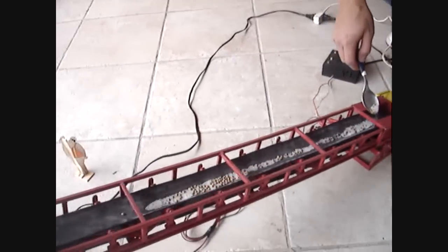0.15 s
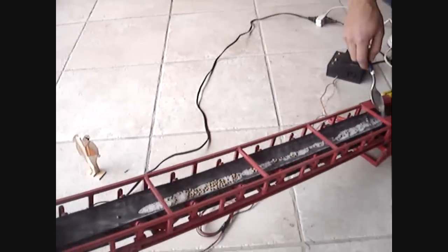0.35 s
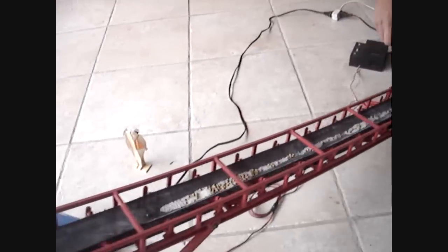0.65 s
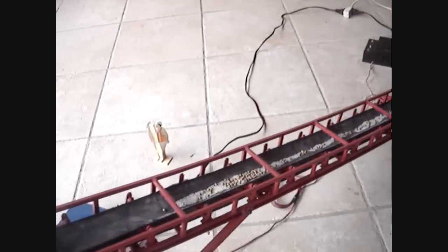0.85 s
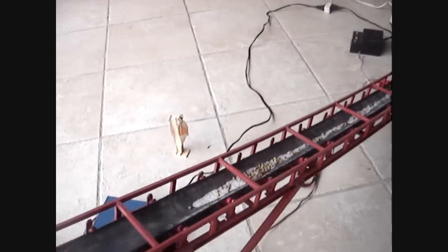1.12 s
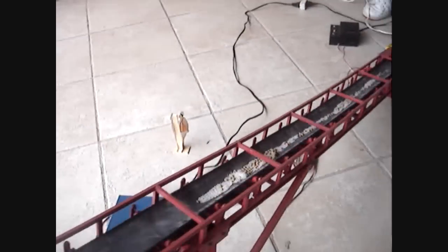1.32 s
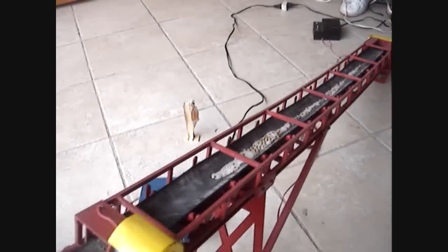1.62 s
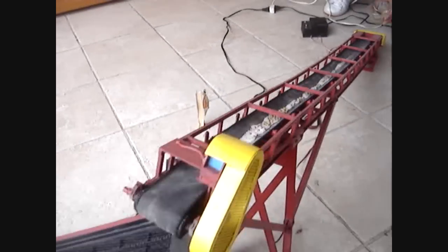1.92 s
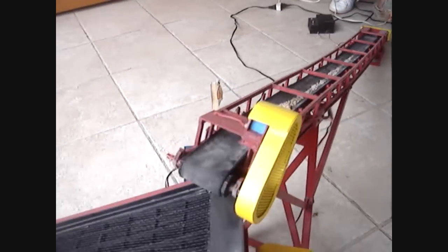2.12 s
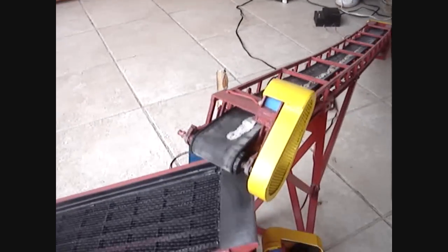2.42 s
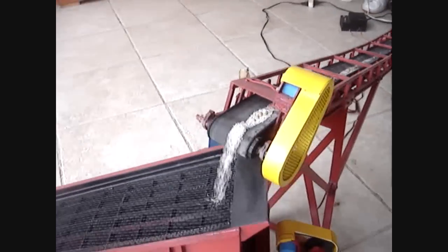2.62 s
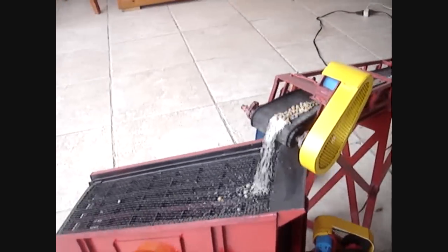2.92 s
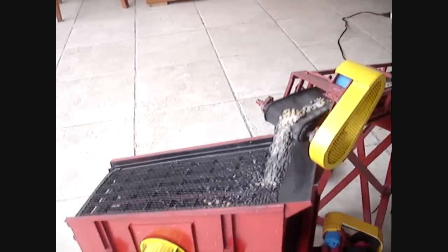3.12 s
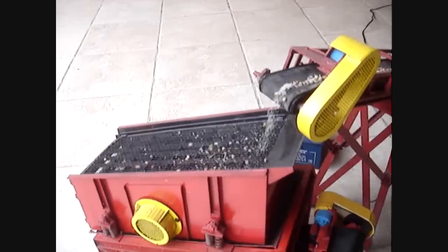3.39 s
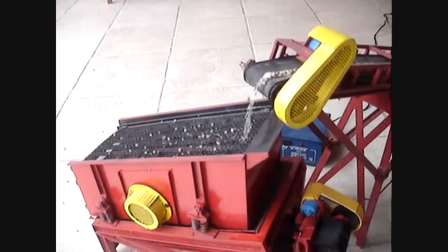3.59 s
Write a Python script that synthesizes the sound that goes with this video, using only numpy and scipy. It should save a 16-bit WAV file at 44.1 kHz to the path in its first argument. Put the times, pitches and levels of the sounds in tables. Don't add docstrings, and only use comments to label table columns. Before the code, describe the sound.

A small motorised conveyor and shaking screen grind and clatter steadily, then gravel patters onto mesh.

```python
import sys
import numpy as np
from scipy import signal
from scipy.io import wavfile
from scipy.ndimage import uniform_filter1d

SR = 44100
rng = np.random.default_rng(int(sys.argv[2]) if len(sys.argv) > 2 else 0)


def level_to_linear(level):
    exponent = np.asarray(level, float) / 20
    return 10 ** exponent


def transcribe(u):
    v = np.clip(np.atleast_2d(u).T, -1, 1)
    q = np.round(v * 32767).astype(np.int16)
    wavfile.write(sys.argv[1], SR, q)


N = 165375

# (time [s], grind level [dB], screen level [dB])
NEARNESS = [
    (0.0, -23, 1),
    (0.54, -23, -1.5),
    (0.82, -23, 0.5),
    (1.71, -21, 2),
    (2.71, -19.5, 6.5),
    (3.07, -21.5, 8),
    (3.59, -21.5, 6.5),
    (3.75, -20.5, -1.5),
]
# (time [s], level [dB])
GRAVEL_FLOW = [
    (0, -66.5),
    (2.6, -67.5),
    (2.8, -50),
    (3.05, -33.5),
    (3.25, -28),
    (3.42, -22),
    (3.55, -22),
    (3.65, -26),
    (3.75, -22),
]
# (time [s], peak level [dB], ring level against the slap [dB])
MESH_SLAPS = [(1.8154, -18, -19), (1.8666, -17, -21), (1.918, -24, -13), (2.0767, -22, -11),
              (2.1273, -24.5, 5), (2.181, -19.5, 7.5), (2.2356, -15.5, -16), (2.2878, -16, -24),
              (2.3414, -13, -12), (2.391, -19.5, 4), (2.4466, -22.5, -20), (2.4995, -13.5, 1),
              (2.5481, -31, -3), (2.6588, -12.5, -1), (2.707, -19, -3), (2.763, -10.5, -9),
              (2.798, -21.5, -2), (2.815, -15, -12), (2.868, -15.5, -18), (2.9206, -13, -14),
              (2.97, -19, 1), (3.028, -11.5, 4), (3.1272, -16.5, -20), (3.185, -12.5, -17),
              (3.234, -32.5, 21), (3.2882, -18.5, 8), (3.342, -13, -25), (3.3914, -22, 8), (3.498, -24, -1),
              (3.655, -25, 16.5)]
# (delay [s], level [dB], rise [s], fall [s])
CLACK_CONTACTS = [
    (.019, -31, 0.0054, 0.011),
    (.049, -37, 0.0028, 0.003),
]
# (delay [s], level [dB], rise [s], fall [s])
THUD_CONTACTS = [
    (0.0336, -29.5, 0.0039, 0.0059),
    (0.0063, -36, 0.0038, 0.0013),
]
# (frequency [Hz], level [dB per Hz])
GRIND_COLOUR = [(70, -27), (160, -23.5), (260, -13), (600, -8.5), (1300, -8.5), (1700, -10.5), (6000, -23),
                (10500, -43)]
# (frequency [Hz], level [dB per Hz])
CLACK_COLOUR = [(1200, -23.5), (2000, -6.5), (3400, -3.5), (5000, -9), (7000, -15), (10500, -25)]
# (frequency [Hz], level [dB per Hz])
THUD_COLOUR = [(150, -21), (260, -15.5), (380, 14.5), (600, 4), (1000, 14), (1600, -26.5), (2500, -10)]
# (frequency [Hz], level [dB per Hz])
STONE_COLOUR = [(700, -23), (1200, -15), (1800, -8), (3300, -6.5), (6500, -11.5), (10500, -18.5)]
# (frequency [Hz], width [Hz], gain [factor])
FRAME_PITCHES = [(184, 13, 0.4), (258.6, 14, 0.91), (356, 19, 1), (492.4, 13.4, 0.82), (603, 120, 0.84),
                 (609, 26.6, 0.62), (702, 23, 1.0), (785, 28, 0.23), (940, 130, 0.72), (1056, 85, 0.53),
                 (1172, 36, 0.33), (1300, 120, 0.25), (3210, 140, 0.14)]
# (frequency [Hz], width [Hz], level [dB])
MESH_PITCHES = [(6376, 430, -2.5), (5080, 480, 0), (6900, 450, -9), (4100, 110, -8.5), (8400, 880, -13.5),
                (2900, 2200, -9)]
# (frequency [Hz], level [dB rms])
HUM_TONES = [
    (29.9, -61),
    (59.8, -61.5),
]
# (time [s], peak level [dB], frequency [Hz])
FRAME_KNOCKS = [(0.039, -11, 760), (0.089, -19, 615), (0.662, -7, 950), (0.819, -11.5, 925),
                (1.209, -9.5, 1020), (1.426, -6.5, 740), (1.556, -20, 417), (1.687, -6.5, 690),
                (1.849, -9, 794), (2.239, -7, 666), (2.289, -12, 620), (2.499, -7, 1000), (2.658, -7, 587),
                (2.769, -14.5, 445), (2.924, -21, 372), (3.028, -6.5, 687), (3.339, -5.5, 603),
                (3.447, -16, 700)]
# (frequency [Hz], width [Hz], level [dB], share of the screen's rise [factor])
BOX_PITCHES = [(587, 42, -4, 1.1), (631.7, 22, -1, 1.47), (700, 13, -2, 0.65), (742, 32, 3, -0.025),
               (922, 43, -2, -0.57), (410, 33, -9.5, 1.2), (1430, 83, -6.5, 1.8)]
# (time [s], frequency [Hz], level [dB])
SQUEAK_GLIDE = [(.88, 1430, -60), (.91, 1450, -34), (.96, 1500, -35), (1.0, 1570, -34), (1.04, 1680, -36),
                (1.09, 1830, -35), (1.12, 1870, -60), (1.21, 1930, -70), (1.24, 1990, -39),
                (1.33, 2030, -38), (1.39, 1970, -41), (1.42, 1950, -65)]
# (time [s], peak level [dB], frequency [Hz])
STAND_KNOCKS = [
    (1.558, -17.5, 397),
    (1.824, -18.5, 433),
    (1.871, -17, 416),
    (2.299, -25, 484),
    (2.552, -19, 333),
    (2.664, -19, 439),
    (2.767, -20, 450),
    (2.926, -17.5, 365),
]
# (time [s], peak level [dB])
HARD_THROWS = [(0.0815, -18), (0.1795, -24), (0.3905, -18), (0.4943, -15), (0.6554, -21), (0.757, -26),
               (0.8126, -16.5), (0.866, -19), (0.9672, -17), (1.1276, -16), (1.1815, -18), (1.2341, -15.5),
               (1.283, -13.5), (1.3384, -23), (1.498, -19), (1.5494, -16), (1.6023, -20), (1.6541, -25),
               (1.7594, -27), (2.023, -22), (3.0494, -12.5), (3.0716, -15), (3.0959, -9.5), (3.204, -18),
               (3.26, -9), (3.4124, -8.5), (3.4494, -8), (3.4745, -15), (3.516, -4.5), (3.5925, -14),
               (3.626, -6), (3.71, -12.5)]
# (time [s], peak level [dB], frequency [Hz])
WALL_KNOCKS = [(0.145, -21, 784), (0.239, -19, 614), (1.501, -17, 644), (1.659, -11, 687), (1.924, -9, 686),
               (1.949, -17, 724), (2.006, -13, 650), (2.06, -13, 707), (2.081, -13, 700),
               (2.162, -9.5, 521), (2.459, -14, 635), (2.555, -6.5, 633), (2.613, -8, 635),
               (2.709, -8, 632), (2.795, -18, 1084), (2.824, -12, 647), (2.871, -9, 620), (2.969, -17, 610),
               (3.059, -16, 643), (3.086, -16, 578), (3.11, -18, 935), (3.179, -16, 708), (3.239, -8, 587),
               (3.289, -6.5, 627), (3.322, -13, 610), (3.403, -21, 886), (3.504, -8, 587),
               (3.549, -11, 636), (3.58, -18, 624), (3.66, -19, 703), (3.689, -9, 942), (3.716, -9.5, 584)]
# (start [s], length [s], frequency [Hz], level [dB])
FACING_PANELS = [(0, 0.35, 720, -30), (0, 0.41, 617, -32), (0.055, 0.27, 1152, -34),
                 (0.54, .65, 917, -30.5), (0.453, 0.6, 700, -30), (0.606, 0.47, 601, -34),
                 (1.107, 0.22, 457, -30), (1.146, 0.1, 1021, -33.5), (3.255, 0.35, 944, -27.5),
                 (2.85, 0.14, 1480, -29.5), (3.4, 0.12, 1246, -26.5)]
# (start [s], length [s], extra step size [dB])
ROUGH_MOMENTS = [(1.61, .025, 4), (1.848, .016, 3), (2.215, .02, 5), (2.3, .037, 8), (2.41, .03, 5),
                 (2.505, .025, 8), (2.64, .011, 3), (2.667, .01, 4), (2.75, .01, 4), (2.772, .02, 4),
                 (2.886, .032, 8), (3.0, .021, 6), (3.26, .16, -4), (3.44, .015, 4), (3.603, .02, 6)]

TURNS_PER_S, TURN_SPREAD_DB, TURN_JITTER_S = 19.0, 1, 0.00099
GRIND_DB, TEETH_PER_S = -1, 5000
RUMBLE_DB = -68
BOX_DB, BOX_PULSE_DB, BOX_DELAY_S = -42, 6, 0.0073
PANEL_WIDTH_HZ = 20
KNOCK_DB, KNOCK_WIDTH_HZ = -5, 130
STAND_DB, STAND_WIDTH_HZ = -0.5, 44
WALL_DB, WALL_WIDTH_HZ = -7.5, 36.6
HARD_DB, HARD_RISE_S, HARD_FALL_S, HARD_ABOVE_HZ = -12, 0.0014, 0.0046, 2500
SLAP_RISE_S, SLAP_FALL_S, SLAP_DB, SLAP_BODY_DB = 0.0077, 0.0028, -5.5, -7
RING_HZ, RING_RISE_S, RING_FALL_S, RING_DB = 3470, 0.0027, 0.0036, -6.5
CRACK_S, CRACK_DB = 3.5, -0.5
STONES_PER_S, HOP_DB, HOP_DELAY_S = 5700, 2, 0.053
ROOM_DB, ROOM_T60_S, WALL_CUT_HZ = -14, 0.44, 6200
CUTOFF_HZ, COARSE_FROM_HZ = 10150, 4950
MASK_S, MASK_HZ = 0.05, 1300
STEP_DB, STEP_TILT_DB, STEP_SWING_DB = -1, 1.27, 5
LEAN_HZ, LEAN_WIDTH_HZ, LEAN_DB = 5500, 500, 3


def rms_one(x):
    return x / np.sqrt(np.mean(x ** 2) + 1e-20)


def in_time(rows):
    s, *columns = np.transpose(rows)
    return [np.interp(np.arange(N) / SR, s, c) for c in columns]


def drift(rate):
    r = np.exp(-80 * np.pi * rate / SR)
    noise = rng.standard_normal(N // 40 + 2002)
    slow = signal.lfilter([1], [1, -2 * r, r * r], noise)[2000:]
    return np.interp(np.arange(N) / 40, np.arange(len(slow)), rms_one(slow))


def resonance(x, hz, width_hz):
    r = np.exp(-np.pi * width_hz / SR)
    top = np.array([1, 0, -1]) * (1 - r * r) / 2
    return signal.lfilter(top, [1, -2 * r * np.cos(2 * np.pi * hz / SR), r * r], x + 1e-18)


def grains(per_s, uneven_db):
    sizes = level_to_linear(uneven_db * np.minimum(rng.exponential(1, N), 5)) * rng.choice([-1, 1], N)
    return rms_one(sizes * (rng.random(N) < per_s / SR))


def coloured(spectrum, per_s, uneven_db, patchy_db):
    points, out = np.array(spectrum), 0
    sources = [grains(per_s, uneven_db), grains(per_s, uneven_db)]
    edges = 60 * 2 ** np.arange(0, 7.8, 1 / 3)
    for k, (low, high) in enumerate(zip(edges, edges[1:])):
        band_filter = signal.butter(2, [low, high], "band", fs=SR, output="sos")
        band = signal.sosfilt(band_filter, sources[k % 2])
        middle = np.log(low * high) / 2
        level_db = np.interp(middle, np.log(points[:, 0]), points[:, 1], left=-70)
        out = out + level_to_linear(level_db + patchy_db * drift(14.2)) * band
    return rms_one(out)


def through_frame(x):
    return rms_one(x + sum(gain * resonance(x, hz, width_hz) for hz, width_hz, gain in FRAME_PITCHES))


def drive(near_db):
    grind = coloured(GRIND_COLOUR, TEETH_PER_S, uneven_db=3.5, patchy_db=1.5)
    return level_to_linear(near_db + GRIND_DB) * through_frame(grind)


def hum():
    t = np.arange(N) / SR
    tones = sum(np.sqrt(2) * level_to_linear(db + 1.5 * drift(3)) * np.sin(2 * np.pi * hz * t) for hz, db in HUM_TONES)
    low_band = signal.butter(2, [15, 110], "band", fs=SR, output="sos")
    rumble = signal.sosfilt(low_band, rng.standard_normal(N))
    return tones + level_to_linear(RUMBLE_DB) * rms_one(rumble)


def box(screen_db):
    pulse = np.cos(4 * np.pi * TURNS_PER_S * (np.arange(N) / SR - BOX_DELAY_S))
    buzz, drone = grains(2500, uneven_db=2.0), 0
    for k, (hz, width_hz, db, share) in enumerate(BOX_PITCHES):
        level_db = BOX_DB + db + share * screen_db + 2.0 * drift(8.9)
        drone = drone + (-1) ** k * level_to_linear(level_db) * rms_one(resonance(buzz, hz, width_hz))
    return level_to_linear(BOX_PULSE_DB * pulse) * drone


def panels():
    t, buzz, out = np.arange(N) / SR, grains(2500, uneven_db=2.5), 0
    for s, length, hz, db in FACING_PANELS:
        swell = np.sqrt(np.sin(np.pi * np.clip((t - s) / length, 0, 1)) + 1e-12)
        out = out + level_to_linear(db) * swell * rms_one(resonance(buzz, hz, PANEL_WIDTH_HZ))
    return out


def bursts(s, db, rise_s, fall_s):
    t = np.arange(int(.12 * SR)) / SR
    shape = (1 - np.exp(-t / rise_s)) ** 2 * np.exp(-t / fall_s)
    marks = np.zeros(N + SR)
    np.add.at(marks, (np.clip(s, 0, None) * SR).astype(int), level_to_linear(db))
    return np.abs(signal.fftconvolve(marks, shape / shape.max())[:N])


def each_turn(contacts):
    turns = np.arange(int(N / SR * TURNS_PER_S) + 1) / TURNS_PER_S
    chance = rng.standard_normal((len(contacts), 2, len(turns)))
    out = 0
    for (delay, db, rise, fall), (early, hard) in zip(contacts, chance):
        out = out + bursts(turns + delay + TURN_JITTER_S * early, db + TURN_SPREAD_DB * hard, rise, fall)
    return out


def screen(screen_db):
    clack = coloured(CLACK_COLOUR, 6000, uneven_db=1.0, patchy_db=0.2)
    thud = through_frame(coloured(THUD_COLOUR, 3000, uneven_db=2.0, patchy_db=.5))
    return level_to_linear(screen_db) * (each_turn(CLACK_CONTACTS) * clack + each_turn(THUD_CONTACTS) * thud)


def knocks(rows, gain_db, width_hz):
    out = np.zeros(N + SR)
    t = np.arange(int(.08 * SR)) / SR
    shape = (1 - np.exp(-t / 0.0015)) ** 2 * np.exp(-np.pi * width_hz * t)
    for s, db, hz in rows:
        i = int(s * SR)
        out[i:i + len(t)] += level_to_linear(db + gain_db) * shape / shape.max() * np.sin(2 * np.pi * hz * t)
    return out[:N]


def hard_throws():
    s, db = np.transpose(HARD_THROWS)
    high_pass = signal.butter(2, HARD_ABOVE_HZ, "high", fs=SR, output="sos")
    rattle = signal.sosfilt(high_pass, coloured(CLACK_COLOUR, 5000, uneven_db=0.5, patchy_db=-1.0))
    return bursts(s, db + HARD_DB, HARD_RISE_S, HARD_FALL_S) * rms_one(rattle)


def squeak():
    hz, db = in_time(SQUEAK_GLIDE)
    phase = 2 * np.pi * np.cumsum(hz + 30 * drift(30)) / SR
    return np.sqrt(2) * level_to_linear(db + 2.5 * drift(28)) * np.sin(phase)


def slaps():
    s, db, ring_db = np.transpose(MESH_SLAPS)
    chatter, mesh = grains(9000, uneven_db=0.5), 0
    for k, (hz, width_hz, level_db) in enumerate(MESH_PITCHES):
        mesh = mesh + (-1) ** k * level_to_linear(level_db) * resonance(chatter, hz, width_hz)
    body = rms_one(resonance(grains(4000, uneven_db=2.5), 2100, 2600))
    mesh = rms_one(mesh) + level_to_linear(SLAP_BODY_DB) * body
    slap = bursts(s - .004, db + SLAP_DB, SLAP_RISE_S, SLAP_FALL_S) * mesh
    plate = np.sin(2 * np.pi * np.cumsum(RING_HZ + 130 * drift(150)) / SR)
    ring = bursts(s - .002, db + ring_db + RING_DB, RING_RISE_S, RING_FALL_S) * plate
    crack = level_to_linear(CRACK_DB + 5.5) * (np.arange(N) == int(CRACK_S * SR))
    return slap + ring + resonance(crack, 4000, 5000)


def gravel():
    flow_db, = in_time(GRAVEL_FLOW)
    hop = np.cos(2 * np.pi * TURNS_PER_S * (np.arange(N) / SR - HOP_DELAY_S))
    patter = through_frame(coloured(STONE_COLOUR, STONES_PER_S, uneven_db=4.0, patchy_db=1.0))
    return level_to_linear(flow_db + HOP_DB * hop) * patter


def room(x):
    out, dull = np.zeros(N), np.exp(-2 * np.pi * WALL_CUT_HZ / SR)
    for k, lag in enumerate((rng.uniform(.015, .045, size=8) * SR).astype(int)):
        loop, gain, state = x.copy(), level_to_linear(-60 * lag / SR / ROOM_T60_S), [0.]
        for i in range(lag, N, lag):
            back, state = signal.lfilter([gain * (1 - dull)], [1, -dull], loop[i - lag:i], zi=state)
            loop[i:i + lag] += back[:N - i]
        out += (loop - x) * (-1) ** k
    return out


def scene():
    near_db, screen_db = in_time(NEARNESS)
    struck = screen(screen_db) + hard_throws() + slaps() + gravel()
    struck = struck + knocks(FRAME_KNOCKS, KNOCK_DB, KNOCK_WIDTH_HZ)
    struck = struck + knocks(STAND_KNOCKS, STAND_DB, STAND_WIDTH_HZ)
    struck = struck + knocks(WALL_KNOCKS, WALL_DB, WALL_WIDTH_HZ)
    steady = drive(near_db) + hum() + box(screen_db) + panels() + squeak()
    return (steady + struck + level_to_linear(ROOM_DB) * room(struck))[None]


def rough_treble(x, size=128):
    n, k = np.arange(2 * size), np.arange(size)
    window = np.sin(np.pi * (n[:, None] + .5) / (2 * size))
    basis = window * np.cos(np.pi / size * (n[:, None] + .5 + size / 2) * (k + .5))
    padded = np.pad(x, (size, 2 * size))
    starts = np.arange(N // size + 1) * size
    lines = padded[starts[:, None] + n] @ basis
    hz = (k + .5) * SR / (2 * size)
    near = uniform_filter1d(lines ** 2, size=5, axis=1) ** 2
    near = uniform_filter1d(near, max(int(MASK_S * SR / size), 1), axis=0)
    near = uniform_filter1d(near, max(int(MASK_HZ / SR * 2 * size), 1), axis=1)
    patches = rng.standard_normal((len(starts) // 8 + 1, size // 4))
    step_db = STEP_SWING_DB * np.kron(patches, np.ones((8, 4)))[:len(starts)]
    when = (starts / SR)[:, None]
    for s, length, db in ROUGH_MOMENTS:
        step_db = step_db + db * np.clip(np.minimum(when - s, s + length - when) / 0.001 + .5, 0, 1)
    step_db = step_db + STEP_DB + STEP_TILT_DB * (hz - COARSE_FROM_HZ) / 1000
    step_db = step_db + LEAN_DB * np.exp(-((hz - LEAN_HZ) / LEAN_WIDTH_HZ) ** 2)
    step = np.sqrt(np.sqrt(np.abs(near) + 1e-24)) * level_to_linear(step_db)
    rounded = np.where(hz > COARSE_FROM_HZ, step * np.round(lines / step), lines) * (hz < CUTOFF_HZ)
    out = np.zeros(len(padded))
    np.add.at(out, starts[:, None] + n, rounded @ basis.T * 2 / size)
    return out[size:size + N]


def roll_off(x):
    return signal.sosfilt(signal.butter(12, 10810, fs=SR, output="sos"), x)


def record(dry):
    top_cut = signal.cheby2(16, 60, CUTOFF_HZ * 1.06, fs=SR, output="sos")
    mix = signal.sosfilt(top_cut, rough_treble(dry[0]))[None]
    return roll_off(mix)


dry = scene()
out = record(dry)
transcribe(out)
```